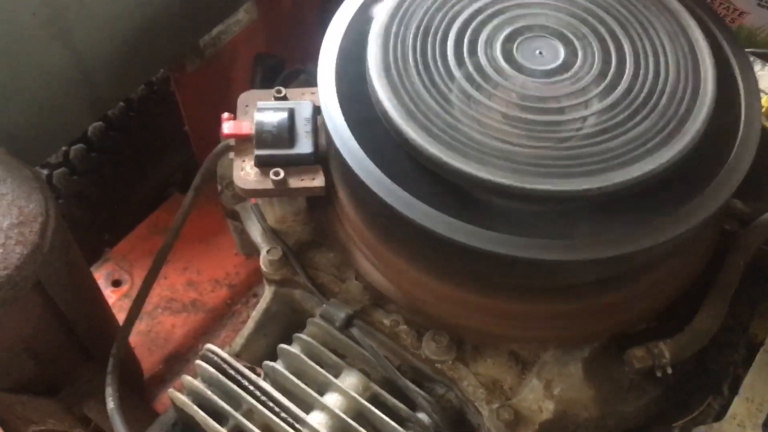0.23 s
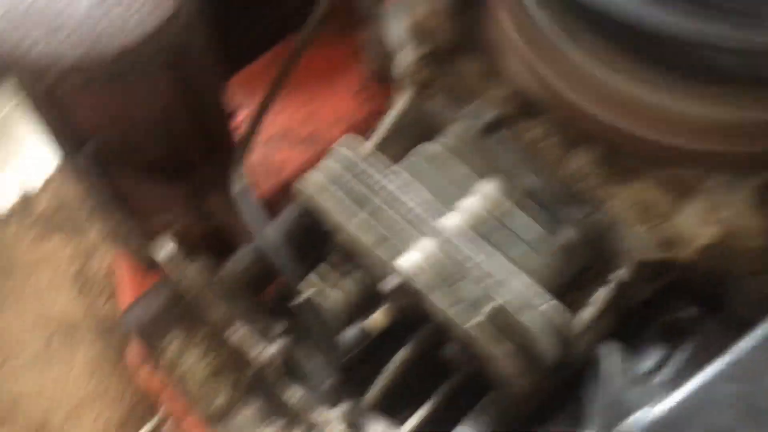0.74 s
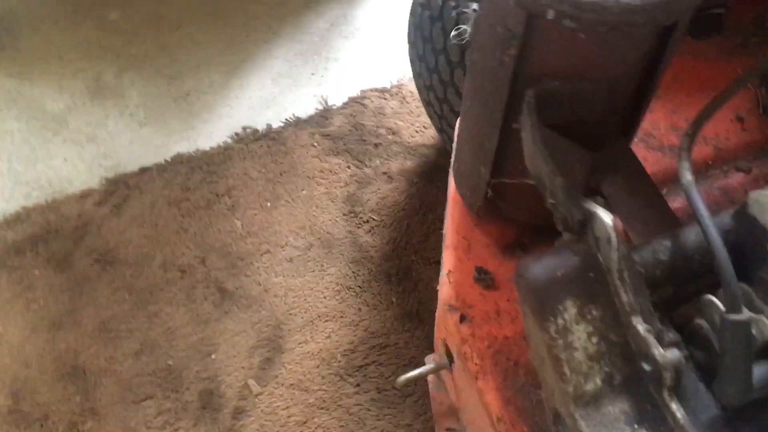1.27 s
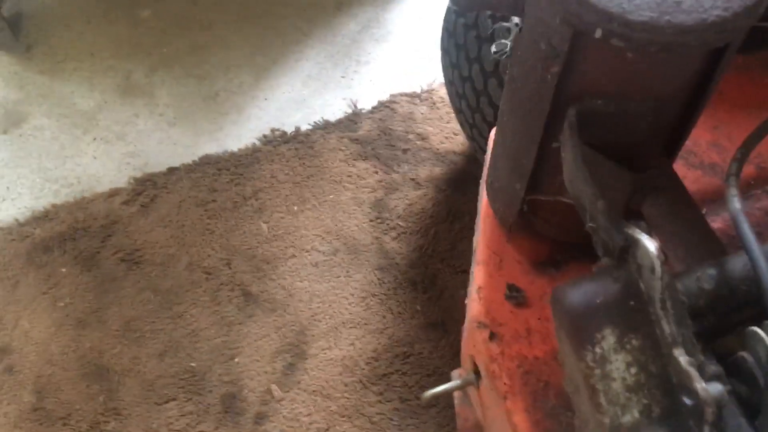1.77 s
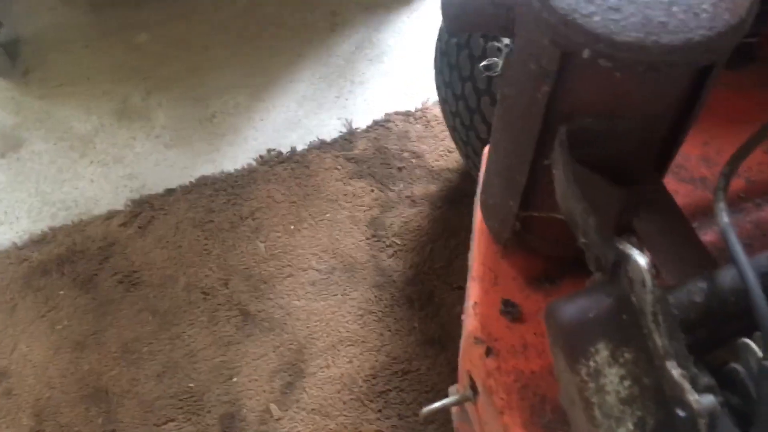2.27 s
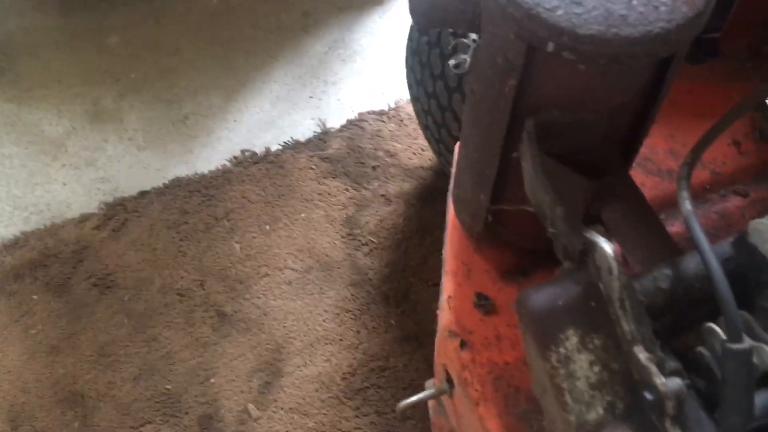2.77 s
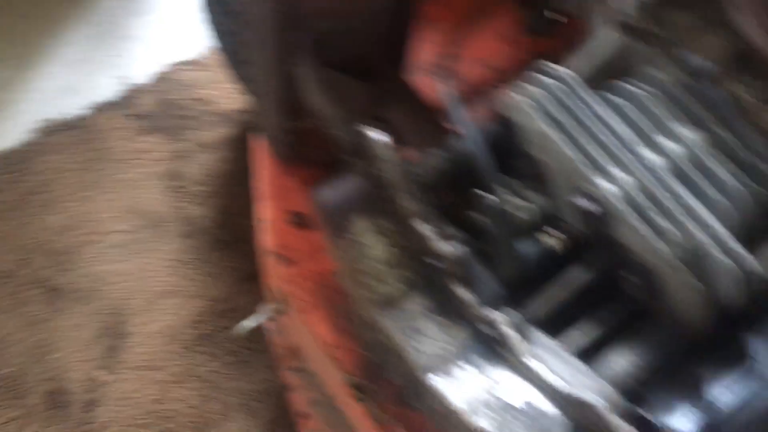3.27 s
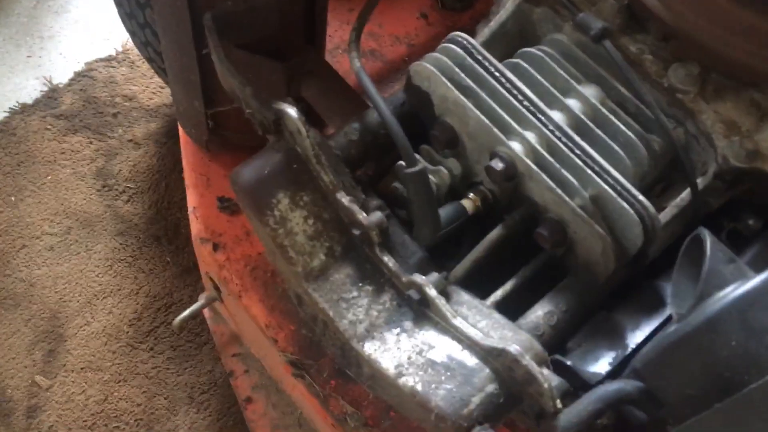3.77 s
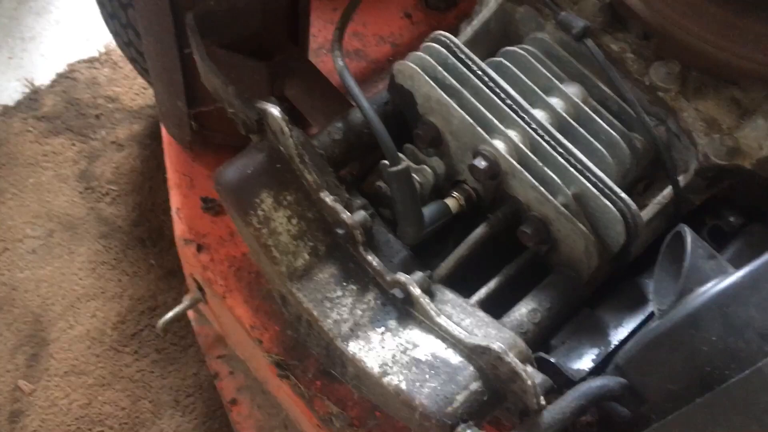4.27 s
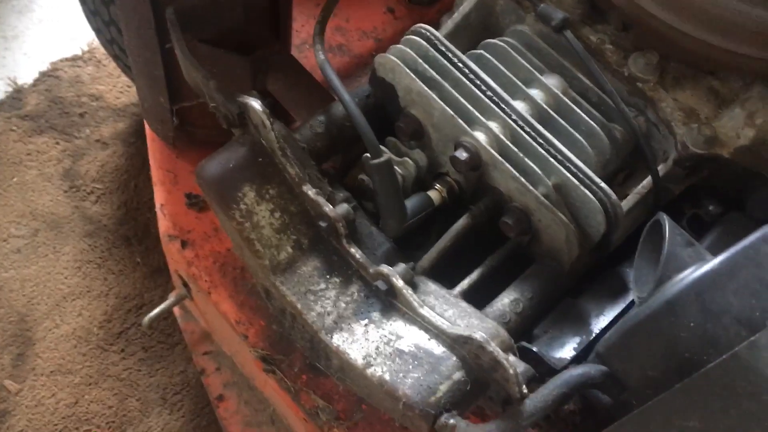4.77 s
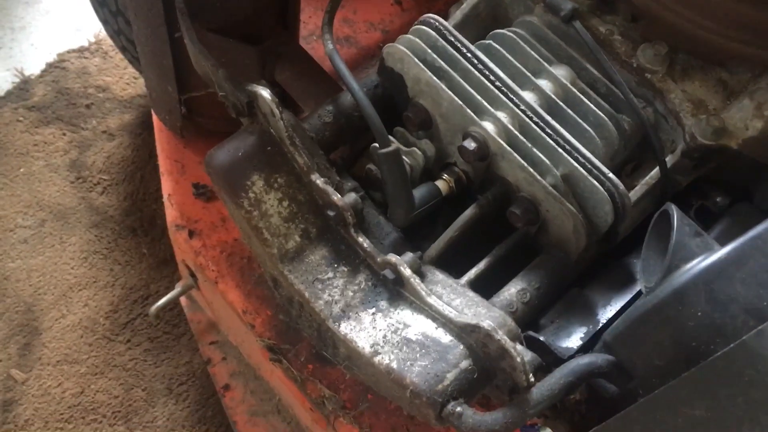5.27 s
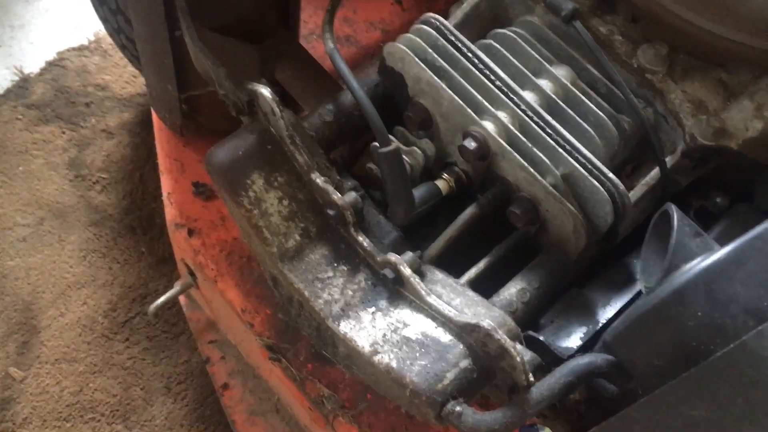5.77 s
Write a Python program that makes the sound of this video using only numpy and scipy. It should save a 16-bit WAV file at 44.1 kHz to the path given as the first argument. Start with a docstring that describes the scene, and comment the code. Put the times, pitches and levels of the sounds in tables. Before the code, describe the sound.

Close up in a garage, a starter gear whines and rattles on flywheel teeth, dipping at each compression, with a regular valve clack and airy gulp.

```python
"""A starter gear whines and rattles on the flywheel teeth of a one-cylinder riding mower in a garage.
The engine is cranked but never fires: whine and rattle sag in pitch at every compression, then recover.
Once a cycle the valve gear clacks and air gulps through the valves; a low shudder and a short echo lie behind.
The whine is a stack of tones and the rattle is noise ringing metal parts, both timed by the tooth count.
The microphone moves from near the flywheel to the deck, then to the head."""
import sys
import numpy as np
from scipy import signal
from scipy.fft import rfft, irfft, next_fast_len
from scipy.io import wavfile

SR = 44100
rng = np.random.default_rng(int(sys.argv[2]) if len(sys.argv) > 2 else 0)


def master_out(mix):
    """Clip the mix to full scale and print it as 16-bit PCM to the path in sys.argv[1]."""
    frames = np.transpose(np.atleast_2d(mix))
    ceiling = np.clip(frames, -1, 1)
    pcm = np.round(ceiling * 32767).astype(np.int16)
    wavfile.write(sys.argv[1], SR, pcm)


N = 265129
TIME = np.arange(N) / SR

# How strongly the meshing gears give off each pitch: pitch_hz, level_db
GEAR_MESH = [(450, -15), (570, -0.5), (700, -7.5), (920, -5.5), (1130, -4), (1350, -6), (1550, 2),
             (1860, 1.5), (2050, 9.5), (2250, 2), (2500, -6), (2760, -16), (3200, -30), (4000, 6.5)]
# Strength of the first four multiples of the tooth rate: level_db
HARMONIC_LEVELS = [0.5, 0, -7, -3.5]
# How the whine's upper harmonics change: time_s, slope_db_per_octave above the second harmonic
WHINE_TILT = [(.7, 2), (1.2, 1), (3.2, 1.5), (3.7, -5)]
# Ringing of flywheel, casing and tinware:
# pitch_hz, half_width_hz (of each filter stage), flywheel_level_db, deck_level_db, head_level_db
CASING_RINGS = [(595, 65, -7.5, -15.5, -10.5), (919, 67, -12, -12, -10), (1125, 1540, -14, -15.5, -16),
                (1520, 68, -4.5, -6.5, -12), (1847, 85, -6, -3.5, -4), (2450, 260, -17, -8, -6),
                (2696, 230, -1, -10.5, -6.5), (3035, 243, -13, -8, -11), (3485, 53, 4, -10, -3),
                (3505, 195, -1, -11, -8), (3916, 64, 4, -10, -5), (4384, 274, -6.5, -13.5, -12),
                (4840, 1900, -12.5, -32, -24), (5440, 330, -16, -10.5, -13), (5870, 115, -7, -0.5, -3),
                (5920, 27, -7, 3.5, 1.5), (6300, 91, -16, -2, -6), (6446, 160, -9.5, -8, -5),
                (7460, 343, -7.5, -6, -6), (7840, 700, -17, -14.5, -16.5), (8417, 130, -21, -18, -21),
                (8770, 190, -1.5, -4, -6), (9120, 200, -8.5, -6, -4.5), (9464, 194, -3.5, -4.5, -5.5),
                (9860, 154, -16, -18, -11), (11360, 140, -2, -15, -12.5), (12000, 650, -13, -16.5, -14),
                (12100, 110, -16, -18, -28), (14254, 440, -16, -18, -16.5), (15000, 565, -24, -23, -26)]
# Where the microphone is: time_s, place (0 flywheel, 1 deck, 2 head), whine_level_db
MIC_PATH = [(0.601, 0.29, -3), (1.099, 1.1, 0.3), (3.1, 1, 0.8), (3.45, 2, 0)]
# Tone colour of a clack: pitch_hz, level_db
CLACK_COLOUR = [(300, -13), (600, 1.5), (800, -5.5), (1400, 1), (2200, -2), (3000, 1), (3800, -2.5),
                (5200, -10.5), (6200, 0), (8000, -5.5), (9100, 2), (10400, -8), (12200, 0), (13500, -8),
                (15500, -9.5)]
# The clack's ring at flywheel, deck and head: level_db
CLANK_LEVELS = [-17.5, -23, -16]
# Cycles in which the clack lands hard: time_s, extra_level_db
HARD_CLACKS = [(1.431, 2.5), (2.986, 2), (3.206, 1.5), (3.429, 3), (3.652, 1), (4.321, 2), (4.767, 3),
               (5.436, 2)]
# Lighter knocks and scrapes in every cycle:
# after_top_s, pitch_hz, half_width_hz (of each filter stage), level_db, length_s (loudest at length / pi)
LIGHT_KNOCKS = [(0.015, 1754, 303, -21, .010), (.046, 11600, 400, -23, 0.0099),
                (0.102, 12000, 1800, -22, .006), (0.099, 6500, 250, -25, 0.0041),
                (0.086, 2751, 50, -20.5, 0.033), (.152, 11550, 350, -25.5, .014),
                (0.175, 14200, 900, -29, .008), (0.183, 12200, 1200, -31, .005)]
# Air let through the valves: after_top_s, pressure_swing (+ out, - in; no unit), centre_to_peak_s
AIR_GULPS = [(0.0903, 0.1, 0.002), (0.112, 0.16, 0.00077), (.1179, -0.21, .0018), (.175, 0.083, 0.0011),
             (0.1922, 0.039, .0011)]
# Booming of muffler and intake: pitch_hz, half_width_hz, level_db
PIPE_BOOMS = [(80, 6.7, 11.5), (107.5, 1.6, 9), (216.3, 9.8, 6), (315.4, 16.8, 13)]
# Low shudder of the frame: pitch_hz, level_db
FRAME_SHUDDER = [(20, -18), (50, -3), (85, 10), (170, -9), (270, -1), (400, -3.5), (600, -9), (1200, -21)]
# How long the garage rings: pitch_hz, time_to_fall_60_db_s
GARAGE_DECAY = [(100, 0.38), (1000, 0.5), (6000, 0.37), (15000, 0.32)]

# The piston reaches the top of compression once in two crank turns; cycles lengthen as the battery tires.
FIRST_TOP_S, CYCLE_S, TIRING_S_PER_CYCLE = .029, .22108, .000094
COUNT = np.arange(-1, 28)
TOP_TIMES = FIRST_TOP_S + CYCLE_S * COUNT + TIRING_S_PER_CYCLE * COUNT ** 2 / 2  # s

# Tooth rate: sags around the top, then runs up on the way down until the exhaust opens.
# FREE_HZ belongs to a cycle of CYCLE_S; longer cycles lower it.
FREE_HZ, SAG_SHARE, SAG_IN_S, SAG_OUT_S, SAG_SHAPE = 920.6, .382, .0215, .0185, 2.6
RUN_UP_SHARE, RUN_UP_AT_S, RUN_UP_WIDTH_S = .032, .069, .03
# The piston's weight pulls and pushes twice a turn: share of speed, chatter swing, delay as share of a swing
SURGE_SHARE, SURGE_DB, SURGE_LAG = .003, 0.66, .35
# The speed also swings once a turn: share of speed, delay as share of a turn
TURN_SHARE, TURN_LAG = .009, .62
PINION_TEETH = 14
TOOTH_JITTER = .03  # typical scatter of a tooth's engagement, as a share of one tooth

# Relative chatter level, and its drop under full compression; low pitches follow only in part
CHATTER_DB, SQUEEZED_DB = -0.01, -7.5
# Whine is louder as the starter pushes to the top, fainter while trapped air drives the crank on.
WHINE_DB, PUSH_DB, PUSH_LEAD_S, PUSH_WIDTH_S = -2, 3, 0.0032, 0.011
COAST_DB, COAST_AT_S, COAST_WIDTH_S = -5, .018, 0.015
# Valve-gear clack: delay after the top, its scatter, blow level before extras, scatter of blow and ring
CLACK_AT_S, CLACK_SCATTER_S, CLACK_DB, CLACK_SCATTER_DB, CLANK_SCATTER_DB = 0.0715, .001, -6.7, 0.14, 2.1

EDGE_HZ, CEILING = 15800, .88  # upper band limit; clipping height before that limit


def whine(teeth, tooth_hz, level_db, db=-23.0, flutter_db=1.55, wobble=0.36,
          ring_hz=577, ring_width_hz=18, ring_db=-2):
    """Harmonics of the tooth rate; as compression slows them they sweep into a ring of the deck."""
    jittered_teeth = teeth + TOOTH_JITTER * wander(500)
    tilt_db = np.interp(TIME, *np.transpose(WHINE_TILT))
    tone = np.zeros(N)
    for k, harmonic_db in enumerate(HARMONIC_LEVELS, 1):
        mesh_db = read(GEAR_MESH, k * tooth_hz)
        slope_db = tilt_db * np.log2(max(k / 2, 1))
        loudness = gain_of(mesh_db + harmonic_db + slope_db + flutter_db * wander(90))
        tone += loudness * np.cos(2 * np.pi * k * jittered_teeth)
    runout = 1 + wobble * np.sin(2 * np.pi * teeth / PINION_TEETH)  # the pinion runs out of true
    tone = gain_of(db + level_db) * tone * runout
    path_s, _, near_db = np.transpose(MIC_PATH)
    direct = gain_of(np.interp(TIME, path_s, near_db)) * tone
    deck_ring = gain_of(ring_db) * resonate(tone, ring_hz, ring_width_hz, order=1)
    return direct + deck_ring


def chatter(teeth, level_db, db=-5.0, spread_db=3, regular=0.51, wobble_db=2.5,
            patchy_db=3.0, low_share=0.33, size=32):
    """Teeth strike and rub with uneven force and ring the metal; under load they close up and quieten."""
    strikes = np.flatnonzero(np.diff(np.floor(teeth)) > 0)
    hits = len(strikes)
    force_db = spread_db * np.minimum(rng.exponential(1, hits), 4)
    force = evened(gain_of(force_db)) * np.sqrt(N / hits)
    slow = TIME[::size]  # levels change in steps of size samples
    swing_db = level_db[::size] + wobble_db * np.sin(2 * np.pi * teeth[::size] / PINION_TEETH)
    place, out = mic_place(slow), np.zeros(N)
    rub = rng.standard_normal(N)
    for hz, half_width, *place_db in CASING_RINGS:
        drive = np.roll(rub, rng.integers(N))  # every part is rubbed with its own timing
        # neighbouring teeth land alike, so brief pitched strands come and go in the rattle
        alike = regular * np.interp(hz, [2000, 3500], [.2, 1])
        blend = alike * wander(70, TIME[strikes]) + (1 - alike) * rng.standard_normal(hits)
        drive[strikes] += force * evened(blend)
        share = np.interp(hz, [2000, 6000], [low_share, 1])  # hard strikes brighten the sound
        near_db = np.interp(place, np.arange(3), place_db)
        mode_db = near_db + share * (swing_db + patchy_db * wander(110, slow))
        loudness = np.repeat(gain_of(mode_db), size)[:N]
        out += resonate(drive * loudness, hz, half_width)
    return gain_of(db) * out / np.sqrt(2)  # strikes and rubbing share the power


def slack(cycle, since, at=0.0207, rise=0.0024, db=-23, uneven_db=2):
    """After the top the starter catches up with the crank: the teeth slap together and ring the casing."""
    u = np.maximum(since - at, 0) / rise
    ring = np.zeros(N)
    for hz, half_width, _, _, head_db in CASING_RINGS:
        ring += gain_of(head_db) * resonate(rng.standard_normal(N), hz, half_width)
    force = gain_of(db + uneven_db * rng.standard_normal(len(TOP_TIMES)))[cycle]
    return u * np.exp(1 - u) * force * evened(ring)


def clacks(ring_db=-1, ring_hz=4440, ring_width_hz=90, rise=0.0031, decay=0.013, ring_time=0.005):
    """A burst of metal on metal in every cycle, with a short clank that swells along with it."""
    crack, ring = np.zeros(N), np.zeros(N)
    scatter = rng.standard_normal((len(TOP_TIMES), 3))
    for top, (late, force, tone) in zip(TOP_TIMES[1:-1], scatter):
        s = top + CLACK_AT_S + CLACK_SCATTER_S * late
        hard_db = sum(extra_db for at, extra_db in HARD_CLACKS if abs(at - s) < CYCLE_S / 2)
        clank_db = np.interp(mic_place(s), np.arange(3), CLANK_LEVELS) + CLANK_SCATTER_DB * tone
        span = slice(round(s * SR), round((s + .1) * SR))
        t = np.arange(len(crack[span])) / SR
        blow = gain_of(CLACK_DB + CLACK_SCATTER_DB * force + hard_db)
        crack[span] += blow * (1 - np.exp(-t / rise)) * np.exp(-t / decay)
        ring[span] += gain_of(clank_db + hard_db + ring_db) * t / ring_time * np.exp(1 - t / ring_time)
    clank = evened(resonate(rng.standard_normal(N), ring_hz, ring_width_hz))
    return crack * coloured(CLACK_COLOUR) + ring * clank


def knocks(cycle, since, db=-1, uneven_db=1.5):
    """Rockers, springs and gear slack sound at fixed points of the cycle, never twice alike."""
    out = np.zeros(N)
    for s, hz, half_width, level_db, length in LIGHT_KNOCKS:
        u = np.maximum(since - s, 0) / length * np.pi
        force = gain_of(level_db + uneven_db * rng.standard_normal(len(TOP_TIMES)))[cycle]
        burst = u * np.exp(1 - u) * force
        out += burst * evened(resonate(rng.standard_normal(N), hz, half_width))
    return gain_of(db) * out


def gulps(since, uneven_db=0.73):
    """Each valve movement shoves air one way and back; muffler and intake boom after it."""
    air = np.zeros(N)
    for s, swing, duration in AIR_GULPS:
        u = (since - s) / duration
        air -= swing * u * np.exp((1 - np.minimum(u ** 2, 100)) / 2)
    boom = np.zeros(N)
    for hz, half_width, mode_db in PIPE_BOOMS:
        boom += gain_of(mode_db) * resonate(air, hz, half_width, order=1)
    return (air + boom) * gain_of(uneven_db * wander(20))


def shudder(db=-33.5):
    """The frame's low shudder, made as steady coloured noise."""
    return gain_of(db) * coloured(FRAME_SHUDDER)


def garage(x):
    """A short diffuse tail, each band dying at its own speed."""
    taps = rng.standard_normal(SR // 2) * (np.arange(SR // 2) > .005 * SR)  # silent for the first 5 ms
    hz, t, z = signal.stft(taps, SR, nperseg=256)
    fading = gain_of(-60 * t / read(GARAGE_DECAY, hz)[:, None])
    tail = signal.istft(z * fading, SR, nperseg=256)[1]
    return signal.fftconvolve(x, tail / np.linalg.norm(tail))[:N]


def crank():
    """For every sample: which cycle it is in, and the seconds since the top of compression."""
    cycle = np.searchsorted(TOP_TIMES, TIME) - 1
    return cycle, TIME - TOP_TIMES[cycle]


def from_top(since):
    """Seconds from the nearest top of compression, negative before it."""
    return np.where(since > CYCLE_S / 2, since - CYCLE_S, since)


def squeeze(since):
    """How hard the trapped air is compressed, 0-1."""
    t = from_top(since)
    return hump(t, np.where(t < 0, SAG_IN_S, SAG_OUT_S), SAG_SHAPE)


def speed(since):
    """Crank speed as a share of free speed: held back by compression, then running up."""
    run_up = RUN_UP_SHARE * hump(since - RUN_UP_AT_S, RUN_UP_WIDTH_S)
    return 1 - SAG_SHARE * squeeze(since) + run_up


def surge(since, lag, count):
    """A swing of -1 to 1 tied to the crank angle, count times in a cycle."""
    t = np.arange(0, CYCLE_S, 1 / SR)
    angle = np.cumsum(speed(t))
    cycle_share = np.interp(since, t, angle / angle[-1])
    return np.cos(2 * np.pi * (count * cycle_share - lag))


def mic_place(time):
    """Microphone place at a time: 0 flywheel, 1 deck, 2 head, sliding in between."""
    path_s, places, _ = np.transpose(MIC_PATH)
    return np.interp(time, path_s, places)


def hump(t, width, shape=2):
    """A smooth bump of height 1 around t = 0."""
    return np.exp(-np.abs(t / width) ** shape)


def gain_of(db):
    """Decibels to a factor."""
    return 10 ** (np.asarray(db) / 20)


def evened(x):
    """Scaled to an rms (average strength) of 1."""
    return x / np.sqrt(np.mean(x ** 2) + 1e-20)


def read(points, hz):
    """A table's value at hz, on a log-frequency axis."""
    f, value = np.transpose(points)
    return np.interp(np.log(hz + 1), np.log(f + 1), value)


def coloured(points):
    """Steady noise of rms 1 with the given spectrum."""
    size = next_fast_len(N)
    spectrum = rfft(rng.standard_normal(size))
    shape = gain_of(read(points, np.fft.rfftfreq(size, 1 / SR)))
    return evened(irfft(spectrum * shape, size)[:N])


def wander(per_s, time=TIME):
    """A random curve of rms 1 with per_s random points a second, joined by straight lines."""
    knots = rng.standard_normal(8000)
    return evened(np.interp(time * per_s, np.arange(len(knots)), knots))


def resonate(x, hz, half_width, order=2):
    """A resonance with a peak gain of about 1; order 2 has steeper skirts."""
    r = np.exp(-2 * np.pi * half_width / SR)
    poles = np.poly([r * np.exp(2j * np.pi * hz / SR)] * order)
    feed = 2 * (1 - r) ** order * poles.real
    feedback = np.convolve(poles, poles.conj()).real
    return signal.lfilter(feed, feedback, x + 1e-18)  # the tiny offset is inaudible


def scene(room_db=-13, unsteady=.006, flywheel_push_db=3):
    """The crank's place in its cycle drives every layer but the steady shudder."""
    cycle, since = crank()
    swing, t = surge(since, SURGE_LAG, count=4), from_top(since)
    free_hz = FREE_HZ * CYCLE_S / np.diff(TOP_TIMES)[cycle]  # longer cycles, lower pitch
    turn_swing = TURN_SHARE * surge(since, TURN_LAG, count=2)
    tooth_hz = free_hz * (speed(since) + SURGE_SHARE * swing + turn_swing)
    teeth = np.cumsum(tooth_hz * (1 + unsteady * wander(30))) / SR  # teeth passed so far

    chatter_db = CHATTER_DB + SQUEEZED_DB * squeeze(since) + SURGE_DB * swing
    push_db = PUSH_DB + flywheel_push_db * np.maximum(1 - mic_place(TIME), 0)  # stronger by the flywheel
    push = push_db * hump(t + PUSH_LEAD_S, PUSH_WIDTH_S)
    coast = COAST_DB * hump(t - COAST_AT_S, COAST_WIDTH_S)
    whine_db = WHINE_DB + push + coast

    metal = whine(teeth, tooth_hz, whine_db) + chatter(teeth, chatter_db) + slack(cycle, since)
    metal += clacks() + knocks(cycle, since)
    echo = gain_of(room_db) * garage(metal)
    return (metal + echo + gulps(since) + shudder())[None]


def record(dry, low_cut_hz=60):
    """The microphone's bass roll-off, clipping at CEILING, then the band limit."""
    thinned = signal.lfilter(*signal.butter(1, low_cut_hz, "high", fs=SR), dry)
    limited = np.clip(thinned, -CEILING, CEILING)
    band_limit = signal.firwin(511, EDGE_HZ, window=("kaiser", 9), fs=SR)
    return signal.oaconvolve(limited, band_limit[None], "same")


dry = scene()
out = record(dry)
master_out(out)
```